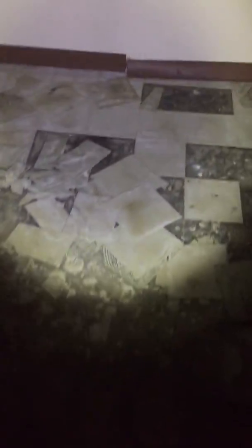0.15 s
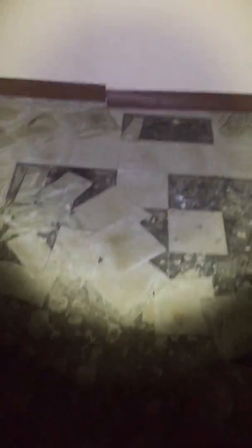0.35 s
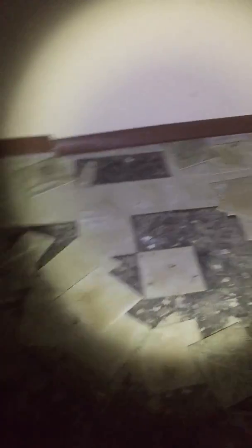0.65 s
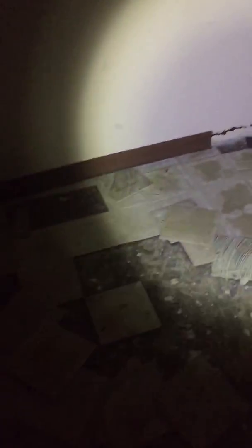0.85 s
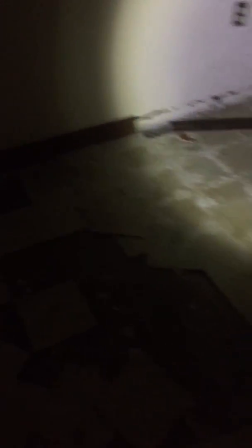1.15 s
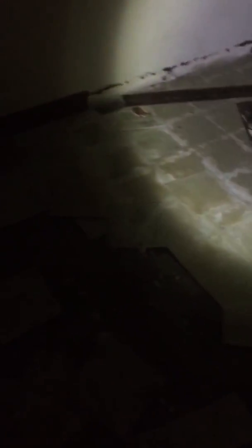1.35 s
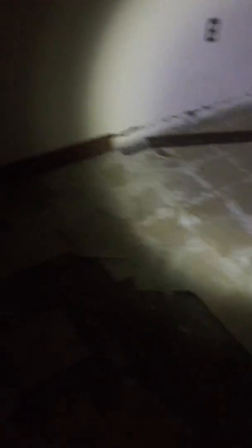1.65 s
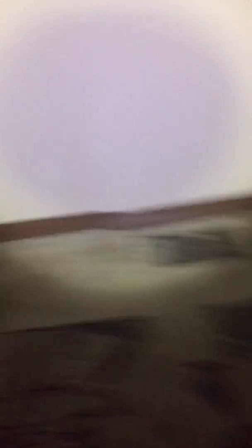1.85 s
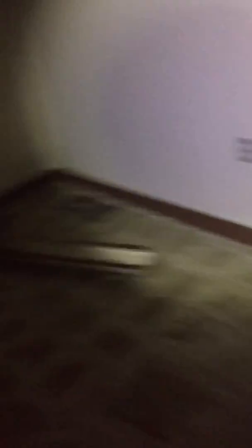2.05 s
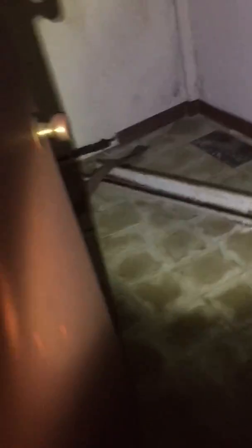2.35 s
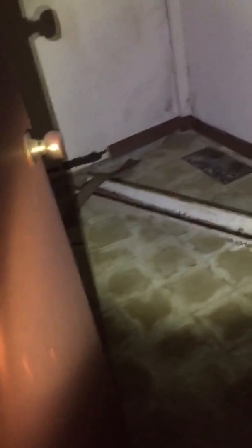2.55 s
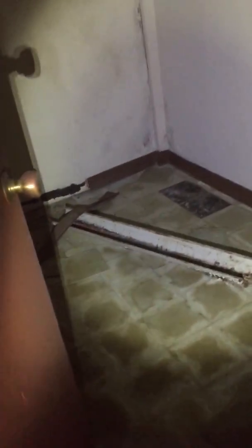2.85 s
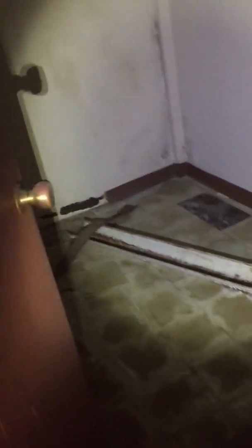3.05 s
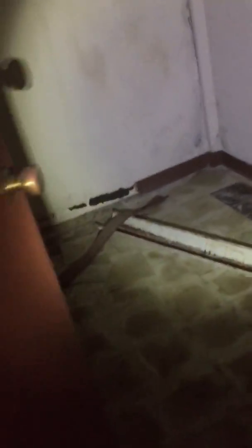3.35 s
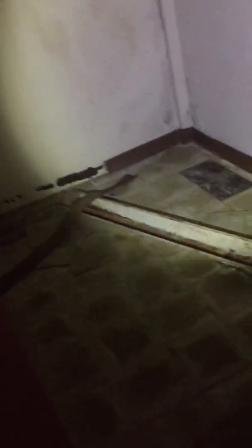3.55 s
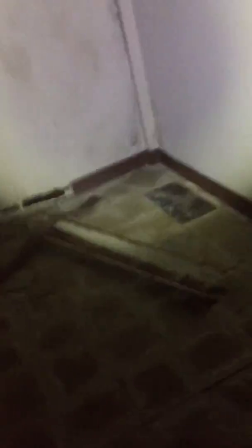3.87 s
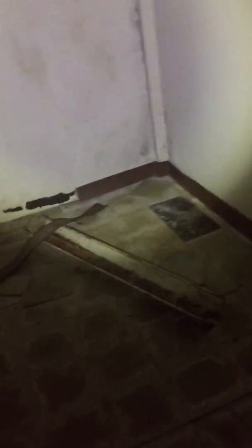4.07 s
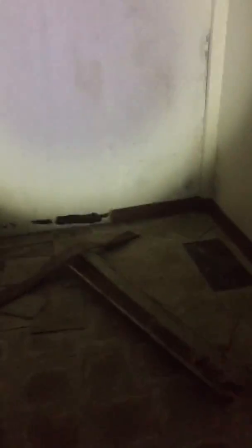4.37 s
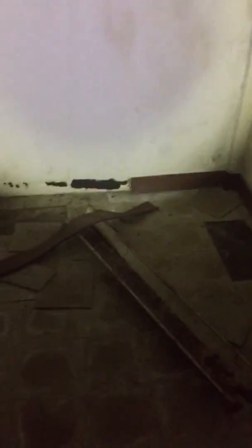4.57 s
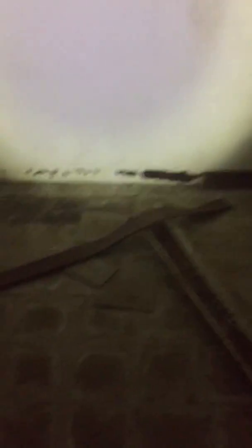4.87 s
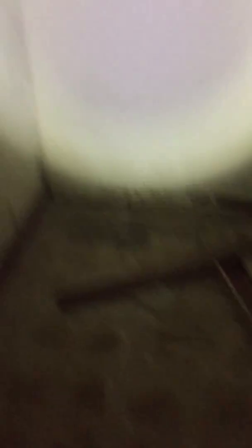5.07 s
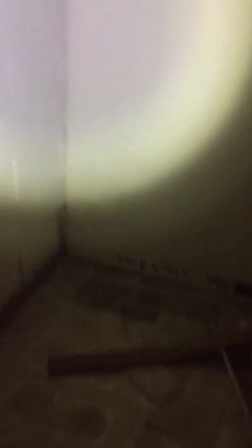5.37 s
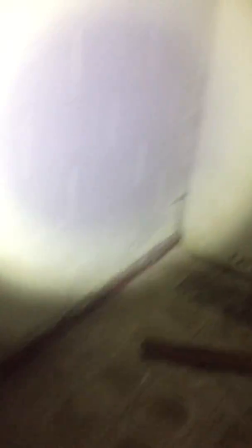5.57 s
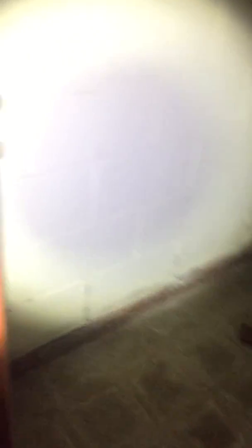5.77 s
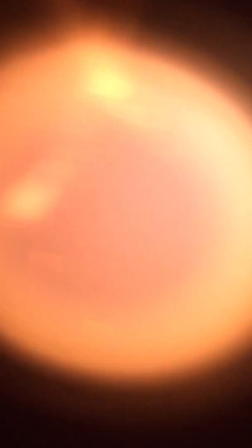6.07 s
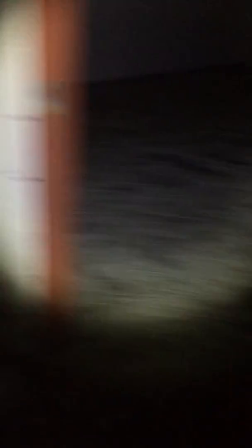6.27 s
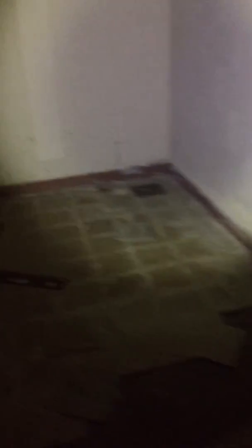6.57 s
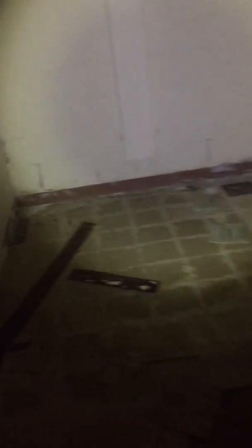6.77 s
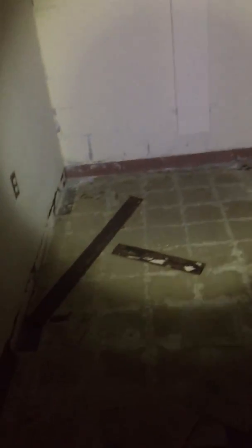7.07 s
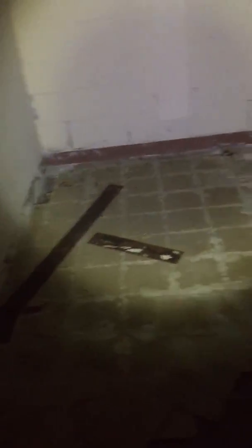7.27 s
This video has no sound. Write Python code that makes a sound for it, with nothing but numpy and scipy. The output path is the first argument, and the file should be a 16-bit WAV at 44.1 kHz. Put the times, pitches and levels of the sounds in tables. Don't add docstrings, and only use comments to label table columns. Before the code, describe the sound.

Someone picks their way over shattered tiles in an empty echoing building, clacking and crunching, pausing quietly, then stepping on again.

```python
import sys
import numpy as np
from scipy import signal
from scipy.fft import rfft, irfft
from scipy.io import wavfile

SR = 44100
rng = np.random.default_rng(int(sys.argv[2]) if len(sys.argv) > 2 else 0)


def invert_db(level):
    return 10 ** (np.asarray(level, dtype=float) / 20)


def pcm_store(signal):
    levels = np.round(np.clip(np.atleast_2d(signal), -1, 1) * 32767)
    wavfile.write(sys.argv[1], SR, levels.astype(np.int16).T)


N = 327212


def rms_one(x):
    return x / np.sqrt(np.mean(x ** 2) + 1e-20)


def peak_one(x):
    return x / np.max(np.abs(x))


def band(x, low_hz, high_hz, order=2):
    edges = [low_hz, min(high_hz, 0.45 * SR)]
    return signal.sosfilt(signal.butter(order, edges, "band", fs=SR, output="sos"), x)


def resonance(x, hz, width_hz):
    r = np.exp(-np.pi * width_hz / SR)
    feedback = [1, -2 * r * np.cos(2 * np.pi * hz / SR), r * r]
    return signal.lfilter([(1 - r * r) / 2, 0, (r * r - 1) / 2], feedback, x)


def double_resonance(x, hz, width_hz):
    return resonance(resonance(x, hz, width_hz), hz, width_hz)


def at_hz(table, hz):
    f, *columns = np.transpose(table)
    return [np.interp(np.log(hz), np.log(f), column) for column in columns]


def strokes(start_s, lasts_s, level_db, rise_s, sag_db, fall_s):
    t = np.arange(0, N, 32) / SR
    gain = np.zeros(len(t))
    for s, lasts, db in zip(start_s, lasts_s, level_db):
        full = s + rise_s
        times = [s - rise_s, full, full + lasts, full + lasts + fall_s]
        levels = [db - 40, db, db - sag_db, db - 60]
        gain += invert_db(np.interp(t, times, levels, left=-200, right=-200))
    return np.interp(np.arange(N) / SR, t, gain)


def plate(force, ridge_db, ridge_width_hz, main_hz, knock_db, high_db, edge_db):
    parts = [(ridge_db, lambda v: double_resonance(v, main_hz, ridge_width_hz)),
             (-4, lambda v: band(v, main_hz * 0.5, main_hz * 1.85, order=3)),
             (knock_db + 11, lambda v: -band(v, 190, 640)),
             (high_db, lambda v: -band(v, 1800, 4500)),
             (edge_db + 10.5, lambda v: band(band(v, 3200, 8700, order=1), 1900, 18000))]
    click = signal.unit_impulse(len(force))
    return sum(invert_db(db) * part(force) / np.sqrt(np.sum(part(click) ** 2)) for db, part in parts)


def snaps(rows, tear_s, ridge_db, ridge_width_hz):
    size = 2048
    direct, all_round = np.zeros((2, N + size))
    t = np.arange(size) / SR
    tearing = rng.standard_normal((len(rows), size))
    for (s, peak_db, *modes), noise in zip(rows, tearing):
        colour = ridge_db, ridge_width_hz, *modes
        heard = invert_db(peak_db - 0.5) * peak_one(plate(noise * t * np.exp(-t / tear_s), *colour))
        mean = plate(signal.unit_impulse(size), *colour)
        start = round(s * SR) - 10
        direct[start:start + size] += heard
        all_round[start:start + size] += mean * np.sqrt(np.sum(heard ** 2) / np.sum(mean ** 2))
    return np.array([direct[:N], all_round[:N]])


# [t/s, peak level/dB, main mode f/Hz, dull knock level/dB re main, high modes level/dB re main]
WHOLE_TILES = [(0.421, -12, 1155, -31.5, -52.5), (0.442, -24, 1230, -32, -48),
               (0.761, -14, 1860, -24, -11.5), (0.821, 4.5, 1500, -22.5, -4),
               (3.594, -33.5, 1278, -34.5, -20.5), (4.502, -11, 1363, -27.5, -6),
               (4.535, -1, 1140, -49.5, -0.5), (4.586, -8.5, 1350, -31.5, 7),
               (4.6094, -6.5, 1144, -35, -5.5), (4.986, -0.5, 1179, -17.5, -5),
               (5.539, -16.5, 860, -18.5, -2.5), (6.421, -14, 1010, -30, -14),
               (6.506, -16.5, 854, -33.5, -9.5)]
# [t/s, peak level/dB, centre f/Hz, high modes level/dB re centre, sharp edge level/dB re centre]
BROKEN_TILES = [(0.716, -36, 1000, -1, -13), (0.753, -16, 1680, -29, -17), (0.788, -22.5, 1660, 8.5, 7.5),
                (4.396, -20, 1842, -7.5, -14.5), (4.422, -13.5, 1730, -6, -11), (4.459, -19, 1900, -5, -15),
                (4.483, -11.5, 1950, -22, -25), (4.911, -22, 1320, -10, -6), (5.413, -32.5, 1150, 2, -4),
                (5.45, -27, 1230, 7, -2), (5.505, -22, 1940, -11, -16.5), (5.727, -26.5, 1170, 6, -17),
                (5.801, -4.5, 1700, -8.5, -15), (6.252, -31, 1300, -29, -24.5),
                (6.293, -30, 2200, -12, -16), (6.326, -13, 1800, -14, -27), (6.331, -7.5, 1470, -16, -15.5),
                (6.44, -13.5, 1090, -6, -7), (6.782, -29, 1170, 0, -19), (6.807, -26, 1376, -14, -30.5),
                (7.11, -47, 1395, -8, 5), (7.149, -52.5, 1230, -11, -9), (7.33, -43, 2330, -8, -6),
                (7.38, -30, 2130, -7, -14)]


def cracks():
    whole = [(*row, -12 + 0.6 * row[-1]) for row in WHOLE_TILES]
    broken = [(s, db, hz, -30.5 - 0.38 * db, *bright) for s, db, hz, *bright in BROKEN_TILES]
    return (snaps(whole, tear_s=0.0015, ridge_db=-2.5, ridge_width_hz=360)
            + snaps(broken, tear_s=0.0016, ridge_db=-9, ridge_width_hz=1300))


def grains(per_s, spread_db):
    sizes = invert_db(spread_db * np.minimum(rng.exponential(1, N), 4)) * rng.choice([-1, 1], N)
    return sizes * (rng.random(N) < per_s / SR) + 1e-18


def clumps():
    clump_s, spread_db = 0.012, 3.5
    at = np.arange(0, N / SR + 0.1, clump_s)
    levels = rng.standard_normal(2000)[:len(at)]
    return rms_one(invert_db(spread_db * np.interp(np.arange(N) / SR, at, levels)))


# [start t/s, lasts t/s, crunch level/dB, fine dust level/dB re crunch, sole rub level/dB re crunch]
SOLE_ROLLS = [(-.03, 0.17, -36, -14.5, -13.5), (0.71, .03, -38, -10, -10), (0.747, 0.048, -19, -9, -8),
              (1.63, .13, -67.5, -18.5, -3.5), (2.1, .14, -67.5, -3.5, -3.5),
              (2.64, 0.36, -61.5, -11.5, -9), (3.16, 0.22, -61.5, -3.5, -12), (3.422, 0.17, -56, -11, -3),
              (3.61, 0.082, -43.5, -21, -6), (3.682, 0.26, -50, -5, -5), (4.403, 0.057, -23, 1, -12),
              (4.486, .035, -25, -9, -15), (4.533, 0.032, -15.5, 2, -21), (4.62, 0.064, -23.5, -2, -8.5),
              (5.203, 0.22, -36.5, -12, 2), (5.419, 0.094, -38.5, -7, -12), (5.517, 0.14, -27, -3, -8),
              (5.7, 0.14, -36.5, -3, -9), (6.264, 0.1, -40, -6, -1), (6.345, .13, -21.5, -5.5, -11.5),
              (6.492, 0.21, -27.5, -2.5, -10), (6.801, 0.064, -29.5, -12, -18),
              (7.12, 0.37, -56.5, -4, -14), (7.365, 0.1, -35, -5.5, -9)]


def grit():
    s, lasts, crunch_db, dust_db, rub_db = np.transpose(SOLE_ROLLS)
    clicks = grains(900, 3.4)
    dealt = rng.integers(0, 14, N)
    crunch = np.zeros(N)
    for k, hz in enumerate(np.geomspace(900, 4200, 14)):
        crunch += band(clicks * (dealt == k) + 1e-18, hz * 0.8, hz * 1.32)
    dust = band(grains(2500, 5.8), 4100, 12000)
    rub = band(grains(600, 6.3), 190, 900)
    mix = np.zeros(N)
    for layer, db in [(crunch, 0), (dust, dust_db), (rub, rub_db)]:
        weight = strokes(s, lasts, crunch_db + db, rise_s=0.01, sag_db=12, fall_s=0.005)
        mix += weight * rms_one(layer)
    return invert_db(-9) * clumps() * mix


# [t/s, peak level/dB]
SHARD_CLICKS = [
    (0.0955, -24),
    (0.0969, -19.5),
]
# [f/Hz, width f/Hz, level/dB]
SHARD_MODES = [(1160, 51, -2), (1660, 39, -9.5), (2760, 46, -1), (2860, 110, 0.5), (4060, 46, -3.5),
               (5940, 52, -10)]


def shard():
    click = np.full(N, 1e-18)
    for s, peak_db in SHARD_CLICKS:
        click[round(s * SR)] = invert_db(peak_db)
    rings = np.zeros(N)
    for hz, width_hz, db in SHARD_MODES:
        rings += invert_db(db) * peak_one(double_resonance(click, hz, width_hz + 150))
    scrape = signal.lfilter([1], [1, -np.exp(-1 / (0.003 * SR))], click)
    rasp = band(scrape * rng.standard_normal(N), 1300, 4500)
    return np.max(click) * (peak_one(rings) + invert_db(-1.5) * peak_one(rasp))


# [t/s, peak level/dB, lowest f/Hz, highest f/Hz, lasts t/s]
SMALL_TICKS = [(0.034, -37.5, 910, 1450, 0.012), (0.088, -28, 4000, 14000, 0.0027),
               (2.651, -53, 1700, 3306, .025), (2.462, -62.5, 1600, 2398, .15),
               (2.85, -61.5, 1600, 2390, .15), (3.209, -60.5, 5480, 15000, .03),
               (3.36, -54, 5000, 7500, 0.011), (3.386, -47, 2064, 2670, 0.022),
               (3.387, -46.5, 450, 1312, 0.033), (3.412, -53, 2010, 2690, 0.018),
               (3.691, -46, 6100, 15000, .01), (3.80, -53, 6000, 15000, .03),
               (4.122, -46.5, 1003, 15060, .002), (4.132, -36.5, 2200, 3500, 0.047),
               (4.133, -51, 3600, 6500, .03), (4.2, -54.5, 450, 1300, 0.099), (4.384, -39, 300, 1100, .006),
               (4.613, -13, 907, 2620, 0.0059), (6.53, -18.5, 1000, 13000, 0.0023),
               (6.83, -40.5, 6600, 8180, 0.038)]


def chips():
    size = 8192
    out, t = np.zeros(N + size), np.arange(size) / SR
    noises = rng.standard_normal((len(SMALL_TICKS), size))
    for (s, peak_db, low_hz, high_hz, lasts), noise in zip(SMALL_TICKS, noises):
        shape = np.minimum(t / 0.0005, 1) * np.exp(-t / lasts)
        burst = band(noise * shape, low_hz, high_hz, order=3)
        start = round(s * SR)
        out[start:start + size] += invert_db(peak_db) * peak_one(burst)
    return out[:N]


def room(x, walls, first_echo_s, build_up_s):
    t = np.arange(2 * SR) / SR
    white = rng.standard_normal((2, len(t)))
    tail = np.zeros(len(t))
    edges = 60 * 2 ** np.arange(0, 8.6, 0.5)
    for k, (low, high) in enumerate(zip(edges, edges[1:])):
        t60, level_db = at_hz(walls, np.sqrt(low * high))
        tail += band(white[k % 2], low, high) * invert_db(level_db - 60 * t / t60)
    swell = 1 - np.exp(-np.maximum(t - first_echo_s, 0) / build_up_s)
    return signal.fftconvolve(x, invert_db(-30) * tail * swell)[:N]


def echoes(x, walls):
    out = np.zeros(N)
    for delay_s, db in walls:
        lag = round(delay_s * SR)
        out[lag:] += invert_db(db) * x[:N - lag]
    return signal.lfilter([0.6], [1, -0.4], out)


# [f/Hz, time to fall 60 dB t/s, level/dB]
FIRST_TAIL = [(120, 1.2, -15.5), (300, 1.8, -5), (800, 1.76, -5.5), (1600, 1.263, -5.5), (4000, 1.12, -8.5),
              (7800, 1, -2.5), (14000, 0.33, -9)]
SECOND_TAIL = [(120, 0.32, -29), (300, 1.43, -2.5), (765, 0.99, -3), (1600, 0.69, 2), (4000, 0.68, -3),
               (7400, 0.64, 1.5), (14000, 0.39, -1.5)]
# [delay t/s, level/dB]
FIRST_WALLS = [(.0085, -10.5), (0.0208, -8.5)]
SECOND_WALLS = [(.006, -9.5), (0.0195, -8.5)]


def two_rooms(direct, all_round):
    doorway_s = 2.0
    early = np.arange(N) < doorway_s * SR
    first = room(all_round * early, FIRST_TAIL, first_echo_s=0.002, build_up_s=0.0037)
    first = first + echoes(direct * early, FIRST_WALLS)
    second = room(all_round * ~early, SECOND_TAIL, first_echo_s=0.0018, build_up_s=0.00073)
    return first + second + echoes(direct * ~early, SECOND_WALLS)


# [start t/s, lasts t/s, deep thump level/dB, floor boom level/dB]
WEIGHT_SHIFTS = [(0.005, .06, -58, -50), (0.107, 0.23, -73, -52.5), (0.415, 0.18, -84, -47),
                 (0.812, 0.089, -62, -40), (1.629, .1, -83, -50), (0.95, 0.31, -83, -54),
                 (3.598, .08, -59, -58), (3.723, .05, -58, -55), (3.91, .05, -58, -66),
                 (4.399, 0.042, -53, -54), (4.452, 0.15, -70, -32.5), (4.643, 0.15, -69, -46),
                 (4.85, 0.13, -65, -52), (4.988, .03, -59, -25), (5.034, 0.076, -64.5, -30.5),
                 (5.13, 0.16, -66, -37), (5.338, .1, -64, -37), (5.47, 0.13, -51.5, -45),
                 (5.576, 0.072, -57, -40), (5.698, .04, -61, -49), (5.801, 0.095, -52, -37),
                 (5.925, 0.17, -84, -53), (6.236, 0.1, -50, -56), (6.332, 0.035, -40, -34.5),
                 (6.387, .12, -57, -45), (6.53, .07, -70, -47), (6.61, 0.056, -57, -50),
                 (6.7, 0.18, -70, -62), (7.233, 0.036, -56, -66), (7.347, .08, -42, -66)]


def thumps():
    s, lasts, deep_db, boom_db = np.transpose(WEIGHT_SHIFTS)
    deep = strokes(s, lasts, deep_db, rise_s=0.02, sag_db=9, fall_s=0.03) + invert_db(-77.5)
    boom = strokes(s, lasts, boom_db, rise_s=0.02, sag_db=9, fall_s=0.03) + invert_db(-68)
    white = rng.standard_normal((2, N))
    grip = deep * rms_one(band(white[0], 46, 90, order=3))
    slab = boom * invert_db(-7) * rms_one(band(white[1], 110, 230))
    return grip + slab


# [t/s, peak level/dB, f/Hz, time to fall 60 dB t/s]
HEEL_THUDS = [(1.635, -44, 131, 0.15), (1.688, -46, 127.5, 0.098), (3.73, -48, 65, 0.1),
              (3.918, -53, 65, .12), (7.225, -44, 59.7, 0.12), (7.365, -34, 70, 0.14)]


def thuds():
    out = np.zeros(N)
    for s, peak_db, hz, t60 in HEEL_THUDS:
        t = np.maximum(np.arange(N) / SR - s, 0)
        swell = np.minimum(t * hz, 1)
        out += invert_db(peak_db - 60 * t / t60) * swell * 2 * np.sin(2 * np.pi * hz * t)
    return out


# [start t/s, lasts t/s, level/dB]
GUSTS = [(1.75, .3, -77.5), (2.122, .06, -75), (2.64, .32, -69), (2.967, 0.039, -59.5), (3.1, .4, -74),
         (3.616, 0.104, -57.5), (3.76, 0.41, -70), (4.23, .06, -67), (4.36, .04, -62)]


def draught():
    moan = double_resonance(rng.standard_normal(N), 340, 90)
    return strokes(*np.transpose(GUSTS), rise_s=0.018, sag_db=5, fall_s=0.04) * rms_one(moan)


# [start t/s, lasts t/s, level/dB]
MOTOR = [(4.552, 1, -59.5)]


def drone():
    note = double_resonance(rng.standard_normal(N), 86.3, 7)
    return strokes(*np.transpose(MOTOR), rise_s=0.1, sag_db=3, fall_s=0.2) * rms_one(note)


# [f/Hz, level/dB per Hz]
HISS_COLOUR = [(59, -38.5), (100, -17), (231, -10), (520, -17.5), (2000, -21), (4400, -26.5),
               (10700, -31.5), (15000, -35)]


def still_air():
    hz = np.maximum(np.arange(N // 2 + 1) * SR / N, 1)
    colour = invert_db(at_hz(HISS_COLOUR, hz)[0])
    return invert_db(-66) * rms_one(irfft(rfft(rng.standard_normal(N)) * colour, N))


def scene():
    direct, all_round = cracks()
    loose, close = grit() + shard(), chips()
    direct = direct + loose + close
    all_round = all_round + loose + invert_db(-6.5) * close
    steps = direct + two_rooms(direct, all_round)
    handling = thumps() + thuds()
    background = draught() + drone() + still_air()
    return (steps + handling + background)[None]


def top_cut(x):
    return signal.sosfilt(signal.butter(12, 16430, fs=SR, output="sos"), x)


# [f/Hz, width f/Hz, share removed/0..1]
HOUSING_DIPS = [(472, 80, 0.47), (5000, 360, 0.16), (10350, 860, 0.49)]


def record(dry):
    for hz, width_hz, share in HOUSING_DIPS:
        dry = dry - share * resonance(dry, hz, width_hz)
    low_pass = signal.cheby2(14, 50, 15700, fs=SR, output="sos")
    mix = np.clip(signal.sosfilt(low_pass, dry), -1, 1)
    return top_cut(mix)


dry = scene()
out = record(dry)
pcm_store(out)
```